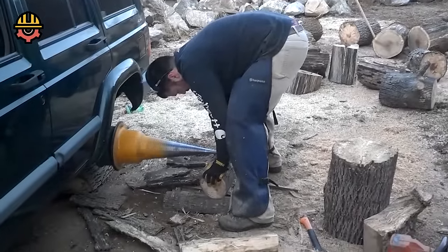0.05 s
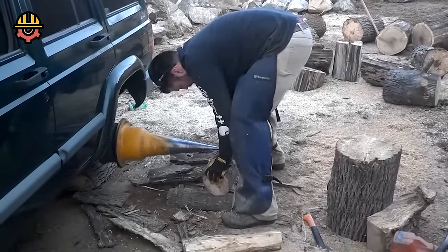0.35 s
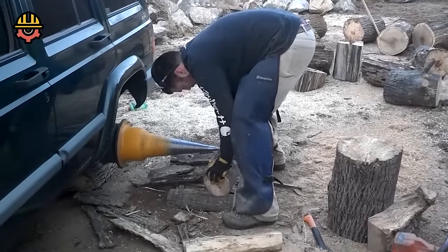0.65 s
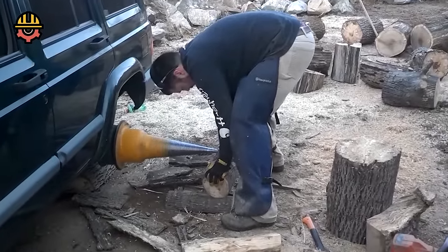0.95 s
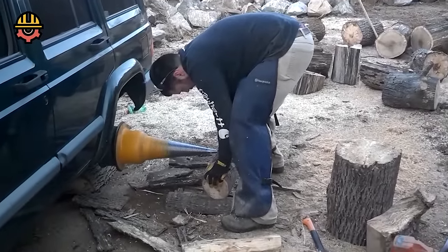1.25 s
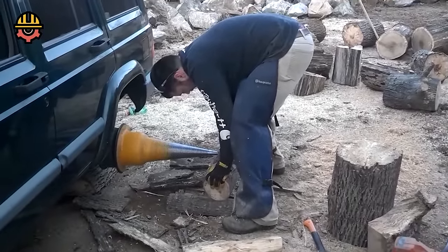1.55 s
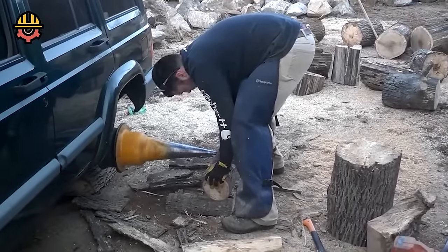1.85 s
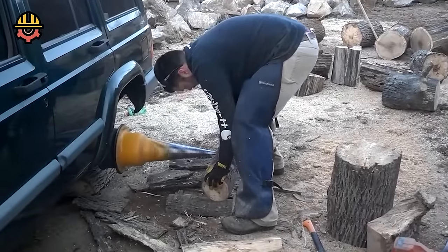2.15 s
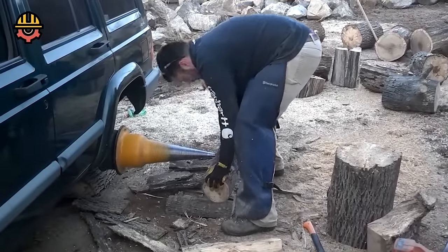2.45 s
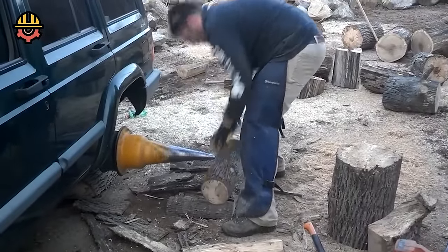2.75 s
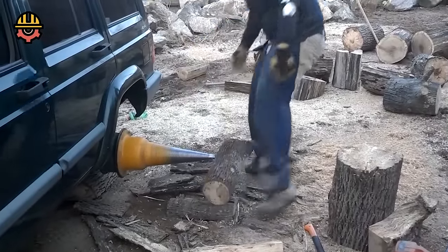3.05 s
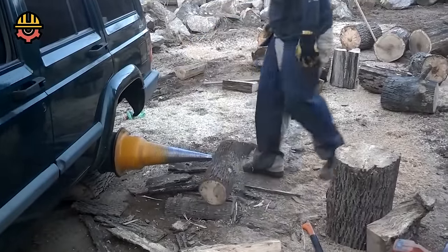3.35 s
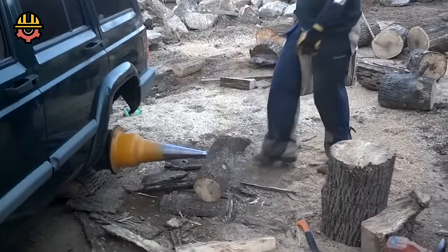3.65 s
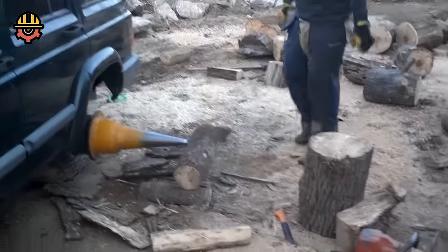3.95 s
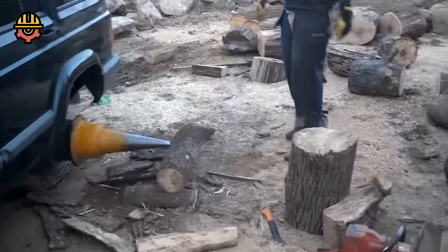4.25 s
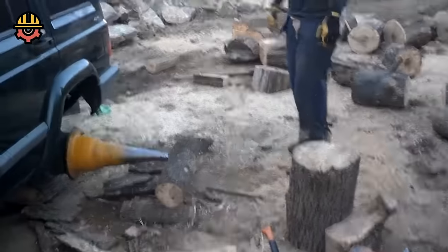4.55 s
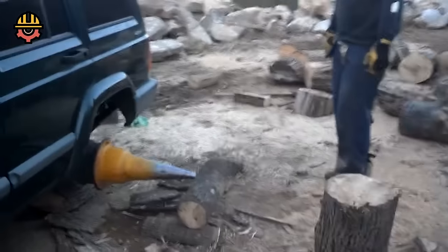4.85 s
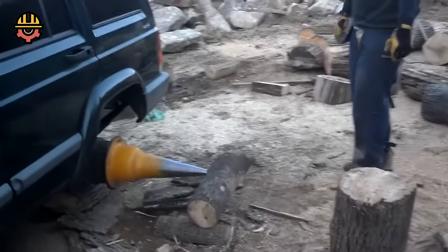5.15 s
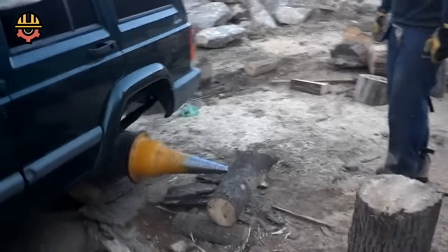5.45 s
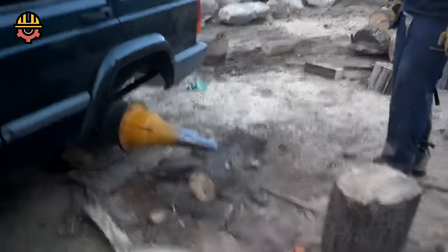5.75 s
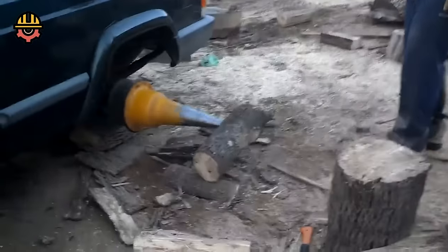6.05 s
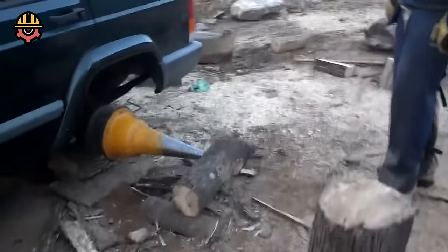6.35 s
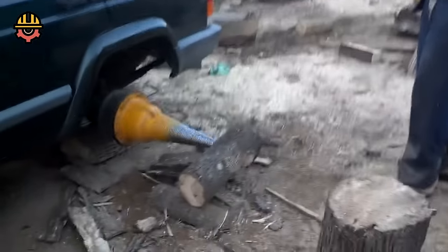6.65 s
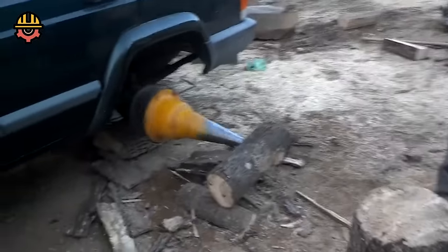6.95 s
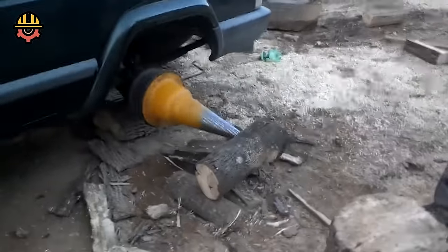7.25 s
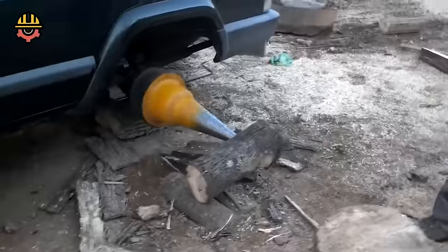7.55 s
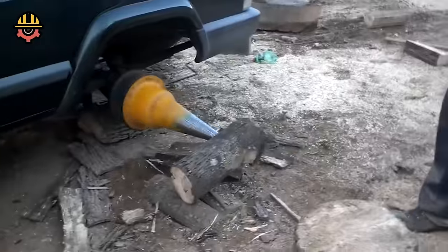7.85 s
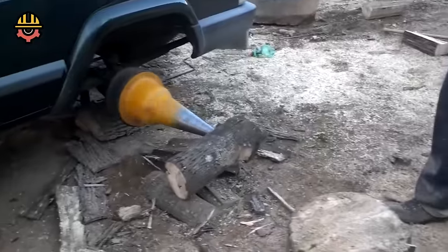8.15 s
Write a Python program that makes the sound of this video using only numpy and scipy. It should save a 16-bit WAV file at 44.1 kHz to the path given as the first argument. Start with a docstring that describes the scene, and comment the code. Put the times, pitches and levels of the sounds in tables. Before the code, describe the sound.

A truck idles in an open yard throughout, a low, throbbing drone. Over it a turning steel screw cone rasps against a log, with short gritty scrapes, ticking splinters and small fibre snaps. A first sharp crack comes at 2 seconds. At about 3.5 seconds the log splits with the loudest crack and a hollow pop, leaving the steel faintly ringing; a thin, faint squeal follows around 4.2 seconds. More hard cracks and pops cluster from 4.6 to 5.1 seconds, and the rasp grows stronger. The overall level ducks after each loud crack and creeps back. From about 4.8 seconds the microphone nears the hub and the engine's boom shifts in tone. The wood keeps crackling, with sharper cracks around 6.5 and 7.7 seconds and a brief squeal at 7.4, until the end at about 8.4 seconds.

```python
"""A truck idles in an open yard, turning a steel screw cone on its rear hub. The cone rasps into a log;
splinters tick and single fibres snap. The first crack comes at 2 s. From 3.5 s the log splits:
pieces pop hollowly, the hardest cracks set the steel ringing, fibres crackle, the cone squeals faintly.
From 4.8 s the phone nears the hub and the engine's boom shifts. Throughout, the phone widens its two
microphone ports; its gain control ducks at each loud crack and creeps back up."""
import sys
import numpy as np
from scipy import signal
from scipy.fft import rfft, irfft, next_fast_len
from scipy.io import wavfile
from scipy.ndimage import uniform_filter1d, map_coordinates

SR = 44100
rng = np.random.default_rng(int(sys.argv[2]) if len(sys.argv) > 2 else 0)


def wav_out(sig):
    """Save sig, one row per channel (or a flat mono array), as 16-bit PCM at SR to the path in sys.argv[1]."""
    wavfile.write(sys.argv[1], SR, np.round(np.clip(np.atleast_2d(sig).T, -1, 1) * 32767).astype(np.int16))


N = 370881

# engine drone level (time [s], level [dB])
DRONE_LEVEL = [(0, -36), (0.2, -37), (0.4, -33.5), (0.55, -37), (0.95, -31.5), (1.3, -32), (1.6, -34),
               (2.0, -34), (2.6, -35.5), (3.4, -35), (4.5, -35), (5.3, -33.5), (6.45, -35), (7.3, -34),
               (8.4, -36)]
# engine, fan and drive train (frequency [Hz], relative density [dB])
DRONE_SPECTRUM = [(45, -17), (65, -31), (105, -1.5), (140, -1.5), (190, -3), (260, 1.5), (340, 1.5),
                  (450, -1.5), (600, -4.5), (780, -9.5), (1300, -11.5), (2300, -14), (7000, -25.5),
                  (15000, -45.5)]
# idle, sagging while the cone is deep in the log (time [s], firing rate [Hz])
FIRING_RATE = [(3.5, 39), (5.8, 38.5), (8.4, 39.9)]
# exhaust lines (multiple of firing rate [1], mean level [dB])
EXHAUST_LINES = [(2, -60.5), (3, -51.5), (4, -61.5)]
# swing of those lines about their mean (time [s], gain [dB])
EXHAUST_SWING = [(0, -4), (1.2, 5), (2.2, -1), (3.4, -6.5), (5.9, 3), (7.6, 3), (8.4, 3)]
# resonances of the truck's underside, from afar (frequency [Hz], relative width [1], gain [dB])
UNDERSIDE_FAR = [(249, 0.037, 4.5), (323.5, 0.04, 3.5), (574, 0.032, 3.5), (933, 0.03, 4.5)]
# the same, near the hub (frequency [Hz], relative width [1], gain [dB])
UNDERSIDE_NEAR = [(195, 0.061, 3), (267, 0.11, 3), (305, 0.072, -2), (377, 0.25, 3.5), (570, 0.44, -3)]
# rub of the thread, louder once it bites deep (time [s], level [dB])
BITE_LEVEL = [(0, -52), (1.65, -47.5), (2.1, -48.5), (3.0, -50), (3.8, -44), (5.2, -39), (6.3, -46),
              (8.4, -44.5)]
# colour of that rub (frequency [Hz], relative density [dB])
BITE_SPECTRUM = [(300, -28), (800, -1), (1200, 6.5), (2300, 9.5), (3300, 11), (4500, 6), (7000, 1),
                 (10000, 0), (15000, -14)]
# scrapes over bark and chips (peak time [s], length [s], level [dB])
SCRAPES = [(0.864, 0.084, -38.5), (1.331, 0.1, -38), (1.823, 0.13, -33.5), (2.291, 0.18, -37),
           (2.767, 0.11, -37.5), (3.099, 0.15, -41), (3.223, 0.12, -41.5), (3.387, 0.074, -39),
           (4.565, 0.14, -41.5), (5.317, 0.15, -33), (8.4, 0.066, -41.5)]
# colour of a scrape (frequency [Hz], relative density [dB])
SCRAPE_SPECTRUM = [(300, -21), (1200, 3), (2300, -3), (3300, 9.5), (4500, 8), (7000, 6), (10000, 1.5),
                   (15000, -19)]
# single fibres snapping (time [s], level [dB], pitch [Hz])
FIBRE_SNAPS = [(0.019, -32, 8700), (0.451, -33.5, 9000), (0.593, -42, 4300), (0.723, -42, 4300),
               (0.975, -39, 7500), (1.0, -39, 4700), (1.266, -39, 4400), (1.444, -37.5, 10100),
               (1.535, -37.5, 4080), (1.603, -40.5, 10000), (1.723, -39, 12500), (1.752, -37, 11900),
               (2.18, -39, 13000), (2.259, -32.5, 9300), (2.383, -38, 9600), (2.847, -42.5, 9200),
               (3.289, -43, 12500), (3.34, -41, 8960), (3.366, -40, 4630), (3.388, -31.5, 10000),
               (3.697, -30.5, 12000), (4.776, -53, 13000), (4.827, -21, 13200), (4.957, -34.5, 6450),
               (4.994, -34, 6840), (5.178, -42, 12700), (5.215, -31.5, 7040), (5.238, -32, 12900),
               (5.485, -35, 9000), (5.653, -31.5, 6400), (5.741, -39, 7200), (5.771, -35, 12500),
               (5.8, -27, 12000), (5.978, -35, 10030), (6.035, -34, 4300), (6.042, -26.5, 13000),
               (6.072, -37, 9700), (6.113, -40, 6800), (6.287, -34, 8440), (6.639, -44, 12500),
               (6.66, -41, 6900), (6.725, -34.5, 12500), (6.804, -24.5, 13000), (6.992, -40, 12570),
               (7.456, -33, 3260), (7.589, -40, 12600), (7.682, -35.5, 12700), (7.797, -38, 4040),
               (8.052, -35.5, 7000), (8.18, -41.5, 12700), (8.276, -42, 4350), (8.359, -43, 4500)]
# colour of a breaking fibre (frequency [Hz], relative density [dB])
SNAP_SPECTRUM = [(800, -4.5), (2000, -4.5), (3000, -0.5), (4500, 1.5), (7000, -1), (10000, -3),
                 (15000, -14.5)]
# the log cracking (time [s], snap level [dB], snap pitch [Hz], snap t60 [s],
# knock level [dB], knock pitch [Hz], knock Q [1], thump level [dB])
CRACKS = [(2.004, -18.5, 7400, 0.016, -15.5, 2100, 0.74, -31),
          (2.398, -26.5, 8100, 0.011, -20, 2430, 2.2, -58), (3.5484, -10.5, 3280, 0.018, 0, 1820, 1.3, -18),
          (3.633, -29.5, 3100, 0.11, -32, 1400, 0.8, -51),
          (3.879, -31.5, 3150, 0.018, -27.5, 1200, 1.5, -52),
          (4.616, -20.5, 6500, 0.013, -13, 1920, 0.65, -25),
          (4.618, -22.5, 4200, 0.013, -17, 1410, 0.76, -30.5),
          (4.79, -13.5, 6540, 0.014, -5, 1600, 1.04, -14),
          (4.7945, -12, 3470, 0.02, -13.5, 1300, 0.52, -12.5),
          (5.0767, -13.5, 5070, 0.0083, -15, 1700, 0.74, -48),
          (5.081, -26, 3700, .016, -16.5, 1290, 1.5, -48),
          (5.164, -26.5, 3600, 0.016, -21.5, 2900, 2.2, -44),
          (5.298, -40, 4300, .02, -25.5, 1500, 0.97, -55), (6.082, -36, 6900, .012, -18.5, 2020, 4.8, -40),
          (6.411, -30, 9800, 0.01, -39.5, 1960, 1.2, -54), (6.521, -15, 4430, 0.016, -15.5, 1660, 1.6, -42),
          (6.755, -20, 9100, 0.014, -25.5, 1680, 0.82, -50), (6.809, -30, 4270, 0.03, -21, 3380, 6.4, -49),
          (6.818, -30, 6900, 0.012, -22.5, 3460, 5.4, -56),
          (6.906, -30.5, 6000, 0.015, -21.5, 2020, 0.47, -48),
          (7.028, -51, 6500, .015, -31.5, 1740, 1.1, -52),
          (7.249, -26, 10600, 0.018, -26, 1530, 1.3, -49.5), (7.409, -37, 4000, 0.013, -30, 1750, 1, -53),
          (7.424, -27.5, 7800, 0.023, -25.5, 1300, 2.4, -32),
          (7.727, -23.5, 5470, 0.0085, -19.5, 1420, 1.6, -50),
          (7.841, -35, 4770, 0.024, -28, 1810, 2.2, -57), (8.194, -24.5, 3950, 0.012, -33, 1500, 0.97, -37)]
# hollow pops of the opening split (time [s], level [dB], pitch [Hz])
POPS = [(3.5481, -5.5, 426), (3.549, -9, 850), (3.879, -29, 1060), (4.615, -24, 380), (4.616, -17, 1030),
        (4.792, -5, 988), (4.793, -6.5, 279), (4.881, -26, 850), (5.022, -23, 830), (5.079, -10, 804),
        (5.803, -30.5, 1330), (6.04, -30, 1230), (6.384, -30, 1920), (6.823, -29, 1250),
        (6.907, -30.5, 695), (7.165, -28, 2060), (7.248, -30, 1060), (7.262, -29, 1220),
        (7.726, -16.5, 1300), (7.9, -34, 1250), (7.95, -35, 1210), (8.196, -27.5, 1164)]
# modes of a split piece (multiple of pitch [1], gain [dB], t60 [s])
PIECE_MODES = [(1, 3, 0.033), (1.24, -6.5, 0.027), (1.56, -5, .035), (2.05, -10.5, 0.034)]
# hardest cracks jolting the steel (time [s], level [dB])
JOLTS = [(3.549, -32.5), (4.616, -38), (4.791, -38), (5.077, -41)]
# modes of cone and hub (frequency [Hz], gain [dB], t60 [s])
STEEL_MODES = [(1098, -3.5, 1.4), (925, -6, 0.53)]
# steel squealing in the wood (peak time [s], length [s], pitch [Hz], level [dB])
SQUEALS = [(4.154, 0.3, 1264, -48.5), (4.42, 0.45, 1260, -50), (7.436, 0.049, 1202, -31)]
# phone body shading the far port (frequency [Hz], gain [dB])
PORT_SHADE = [(600, 0.5), (3000, -10)]
# share of the other port subtracted (frequency [Hz], gain [dB])
CROSSFEED = [(1200, 0.5), (3000, -0.04)]
# microphone's top-end lift (frequency [Hz], gain [dB])
MIC_LIFT = [(11500, -0.5), (13000, 7.5), (15300, 13.5)]

APPROACH_S = (4.8, 7.8)
TEAR_S = 0.012  # tearing ahead of each break
FIBRE_T60_S, FIBRE_KNOCK_REL_DB, FIBRE_KNOCK_HZ = 0.008, -9, 1310


def amp(db):
    """Decibels to gain."""
    return 10 ** (np.asarray(db) / 20)


def unit(x):
    """Scale to rms 1."""
    return x / np.sqrt(np.mean(x ** 2) + 1e-20)


def gain_at(points, hz):
    """Gain from (Hz, dB) points on a log-frequency axis."""
    knots_hz, db = np.transpose(points)
    return amp(np.interp(np.log(hz + 1), np.log(knots_hz + 1), db))


def curve(points):
    """One value per sample from (s, value) points."""
    return np.interp(np.arange(N) / SR, *np.transpose(points))


def wobble(rate_hz):
    """Smooth random curve, rate_hz knots a second."""
    knots = rng.standard_normal(int(N * rate_hz / SR) + 4)
    return map_coordinates(knots, [np.arange(N) * rate_hz / SR])


def swell(peak_s, length_s):
    """Smooth rise to 1 at peak_s, and fall."""
    return np.cos(np.pi * np.clip((np.arange(N) / SR - peak_s) / length_s, -.5, .5)) ** 2


def filtered(x, response):
    """Apply a complex frequency response."""
    n = x.shape[-1]
    padded = next_fast_len(n + 4096)
    return irfft(rfft(x, padded) * response(np.fft.rfftfreq(padded, 1 / SR)), padded)[..., :n]


def coloured(x, spectrum):
    """Shape by a spectrum table, at rms 1."""
    return unit(filtered(x, lambda hz: gain_at(spectrum, hz)))


def bump(hz, centre_hz, width, db):
    """Gain of a rounded peak on a log-frequency axis."""
    return amp(db * np.exp(-(np.log((hz + 1) / centre_hz) / width) ** 2))


def bandpass(hz, centre_hz, q):
    """Causal two-pole resonance."""
    damping = 1j * hz * centre_hz / q
    return damping / (centre_hz ** 2 - hz ** 2 + damping)


def add(track, start_s, sound):
    """Mix a sound in from start_s."""
    part = track[..., max(0, round(start_s * SR)):][..., :sound.shape[-1]]
    part += sound[..., :part.shape[-1]]


def engine():
    """Exhaust lines under a drone that throbs with each firing and booms beneath the truck."""
    phase = 2 * np.pi * np.cumsum(curve(FIRING_RATE) * (1 + 0.0086 * wobble(4))) / SR
    exhaust = sum(amp(db + 1.5 * wobble(11)) * np.sqrt(2) * np.sin(k * phase + rng.uniform(0, 2 * np.pi))
                  for k, db in EXHAUST_LINES)
    throb = amp(np.cos(phase) + 0.82 * wobble(11)) * rng.standard_normal((2, N))
    boom = lambda peaks: filtered(throb, lambda hz: np.prod([bump(hz, *p) for p in peaks], axis=0))
    near = np.interp(np.arange(N) / SR, APPROACH_S, [0, 1])
    drone = coloured((1 - near) * boom(UNDERSIDE_FAR) + near * boom(UNDERSIDE_NEAR), DRONE_SPECTRUM)
    return amp(curve(DRONE_LEVEL) - 2) * drone + amp(curve(EXHAUST_SWING)) * exhaust


def rasp(spectrum, grains_per_s, grain_t60_s, hiss):
    """Scraped wood: dry hiss, with tiny fibres popping at random."""
    impulses = (rng.random(N) < grains_per_s / SR) * amp(9.6 * np.minimum(rng.exponential(size=N), 3.5))
    t = np.arange(SR // 50) / SR
    grains = unit(signal.fftconvolve(impulses, amp(-60 * t / grain_t60_s))[:N])
    return coloured((hiss + grains) * rng.standard_normal((2, N)), spectrum)


def thread_rub(flutter_db=2.5, flutter_hz=22):
    """The thread grips and slips in the wood, so its rasp flutters."""
    envelope = amp(curve(BITE_LEVEL) - 0.5 + flutter_db * wobble(flutter_hz))
    return envelope * rasp(BITE_SPECTRUM, grains_per_s=150, grain_t60_s=0.096, hiss=1.1)


def splinters(above_bite_db=1.5, spread_db=5.5, pitch_hz=4670, count=420, t60_cycles=45):
    """Splinters flick loose as the thread bites; each rings at a pitch set by its length."""
    bite_db = curve(BITE_LEVEL)
    ticks, t = np.zeros((2, N)), np.arange(SR // 25) / SR
    for when, size, shortness, phase_cycles in rng.random((count, 4)):
        hz = np.clip(pitch_hz * 2 ** (2.74 * (shortness - .5)), 600, 14000)
        db = bite_db[int(when * N)] + above_bite_db + spread_db * size ** 3
        tone = np.sin(2 * np.pi * (hz * t + np.array([[0], [phase_cycles]])))
        add(ticks, when * N / SR, amp(db - 60 * t * hz / t60_cycles) * tone)
    return ticks


def burst(t60_s, response, tear_db, yard_db, yard_t60_s):
    """Fibres tear, then give way in a volley of clicks; the yard scatters the blow."""
    t = np.arange(SR // 6) / SR - TEAR_S
    tear = amp(tear_db + 60 * np.minimum(t, 0) / 0.013)
    envelope = np.where(t < 0, tear, amp(-60 * np.abs(t) / t60_s))
    noise = rng.standard_normal((2, len(t)))
    clicks = unit(noise * np.abs(noise))
    scatter = (t > 0) * amp(yard_db - 60 * t / yard_t60_s) * rng.standard_normal((2, len(t)))
    spectrum = rfft(envelope * clicks + scatter)
    whitened = irfft(spectrum / uniform_filter1d(np.abs(spectrum), size=130), len(t))
    return unit(filtered(whitened, response)) * np.sqrt(.008 * SR / len(t))  # energy of 8 ms at rms 1


def wood_modes(q, peak_db, count=14):
    """Response of one piece of wood: its own random resonances."""
    centres_hz = np.geomspace(700, 10000, count) * np.exp(rng.uniform(-0.21, 0.22, count))
    return lambda hz: np.prod([1 + (amp(peak_db) - 1) * bandpass(hz, c, q) for c in centres_hz], axis=0)


def fracture(snap_db, snap_hz, snap_t60_s, knock_db, knock_hz, knock_q=2.2, peak_db=7.0):
    """Wood breaks: a bright snap and the freed splinter's knock, through the same resonances."""
    modes = wood_modes(q=22, peak_db=5.5)
    fibre = lambda hz: modes(hz) * gain_at(SNAP_SPECTRUM, hz) * bump(hz, snap_hz, width=0.34, db=peak_db)
    splinter = lambda hz: modes(hz) * bandpass(hz, knock_hz, knock_q) ** 2
    snap = amp(snap_db + 1.5) * burst(snap_t60_s, fibre, tear_db=-18, yard_db=-11.5, yard_t60_s=0.081)
    knock = amp(knock_db) * burst(0.0091, splinter, tear_db=-22, yard_db=-17, yard_t60_s=0.082)
    return snap + knock


def fibre_snaps(thin_hz=10000, thin_peak_db=5.5, db_per_octave=6.5):
    """Single fibres snap with a small knock; thicker, lower ones ring more."""
    wood = np.zeros((2, N))
    for s, db, pitch_hz in FIBRE_SNAPS:
        peak_db = thin_peak_db + db_per_octave * np.log2(thin_hz / pitch_hz)
        snap = fracture(db, pitch_hz, FIBRE_T60_S, db + FIBRE_KNOCK_REL_DB, FIBRE_KNOCK_HZ,
                        peak_db=peak_db)
        add(wood, s - TEAR_S, snap)
    return wood


def scrapes():
    """The cone drags over bark, and boots scuff the chips: short swells of brighter, grittier rasp."""
    envelope = sum(amp(db - 0.5) * swell(s, length_s) for s, length_s, db in SCRAPES)
    return envelope * rasp(SCRAPE_SPECTRUM, grains_per_s=180, grain_t60_s=0.018, hiss=1.0)


def cracks():
    """The log cracks open: each fracture also thumps the whole log."""
    wood = np.zeros((2, N))
    body = lambda hz: bandpass(hz, centre_hz=352, q=1.05) ** 2
    for s, *snap_and_knock, thump_db in CRACKS:
        thump = amp(thump_db) * burst(0.026, body, tear_db=8, yard_db=-6.5, yard_t60_s=0.2)
        add(wood, s - TEAR_S, fracture(*snap_and_knock) + thump)
    return wood


def pops(rise_cycles=0.5):
    """The split jerks wider; the loosened piece rings briefly at its own pitch."""
    wood, t = np.zeros((2, N)), np.arange(SR // 10) / SR
    for s, db, pitch_hz in POPS:
        cycles = pitch_hz * t
        ring = sum(amp(mode_db - 60 * t / t60_s) * np.sin(2 * np.pi * (k * cycles + rng.random((2, 1))))
                   for k, mode_db, t60_s in PIECE_MODES)
        add(wood, s, amp(db) * (1 - np.exp(-cycles / rise_cycles)) * ring)
    return wood


def steel_ring():
    """Cone and hub ring on after the hardest cracks."""
    ring, t = np.zeros(N), np.arange(2 * SR) / SR
    modes = sum(amp(db - 60 * t / t60_s) * np.sin(2 * np.pi * hz * t) for hz, db, t60_s in STEEL_MODES)
    for s, db in JOLTS:
        add(ring, s, amp(db) * modes)
    return ring


def crackle(start_s=3.6, floor_db=-45.5, spread_db=6.5, pitch_hz=8900, count=22):
    """As the cone wedges the log apart, faint fibres give way at random."""
    wood = np.zeros((2, N))
    for when, size, shortness in rng.random((count, 3)):
        db = floor_db + spread_db * size
        scale = 2 ** (shortness - .5)
        snap = fracture(db, pitch_hz * scale, FIBRE_T60_S, db + FIBRE_KNOCK_REL_DB, FIBRE_KNOCK_HZ * scale)
        add(wood, start_s + when * (N / SR - start_s), snap)
    return wood


def squeals(jitter_hz=5):
    """Steel turning in the wood: thin, unsteady tones."""
    tones = np.zeros(N)
    for s, length_s, pitch_hz, db in SQUEALS:
        phase = 2 * np.pi * np.cumsum(pitch_hz + jitter_hz * wobble(40)) / SR
        tones += amp(db) * swell(s, length_s) * np.sin(phase)
    return tones


def ports(field, lag_ms, alike_hz):
    """The far port hears a source later, shaded, and less alike as pitch rises."""
    alike = lambda hz: np.exp(-(hz / alike_hz) ** 2)
    shared = filtered(field[0], lambda hz: alike(hz) * np.exp(-2j * np.pi * hz * lag_ms / 1000))
    own = filtered(field[1], lambda hz: np.sqrt(1 - alike(hz) ** 2))
    far = filtered(shared + own, lambda hz: gain_at(PORT_SHADE, hz))
    return np.array([field[0], far])


def scene():
    """Truck and log reach the two ports, each from its own direction."""
    truck = ports(engine(), lag_ms=0.17, alike_hz=1620)
    scraping = thread_rub() + scrapes() + splinters()
    breaking = cracks() + fibre_snaps() + pops() + crackle()
    steel = (steel_ring() + squeals()) * amp(4.1 * wobble(39))  # level flickers
    return truck + ports(scraping + breaking + steel, lag_ms=0.26, alike_hz=2000)


def widen(x, bass_hz, spacing_s=16 / SR):
    """Each channel subtracts the other port, delayed by their spacing; lost bass is lifted back."""
    other = filtered(x[::-1], lambda hz: gain_at(CROSSFEED, hz) * np.exp(-2j * np.pi * hz * spacing_s))
    return filtered(x - other, lambda hz: 1 + bass_hz / (1j * hz + 20))


def gain_control(x, threshold_db, recovery_db_per_s):
    """Loud treble pulls the gain down at once; it climbs back steadily."""
    treble = filtered(x, lambda hz: hz > 3600)
    power = np.abs(uniform_filter1d(np.mean(treble ** 2, axis=0), size=350))
    excess_db = np.maximum(10 * np.log10(power + 1e-12) - threshold_db, 0)
    climb_db = recovery_db_per_s * np.arange(N) / SR
    return x * amp(climb_db - np.maximum.accumulate(excess_db + climb_db))


def record(dry):
    """The phone: widening, gain control, top-end lift, bass cut, band limit."""
    low_cut_hz, top_hz = 67.0, 16000
    ducked = gain_control(widen(dry, bass_hz=394), threshold_db=-28, recovery_db_per_s=7.5)
    mic = lambda hz: gain_at(MIC_LIFT, hz) * hz ** 3 / np.sqrt(hz ** 6 + low_cut_hz ** 6)
    return filtered(filtered(ducked, mic), lambda hz: hz < top_hz)


dry = scene()
out = record(dry)
wav_out(out)
```